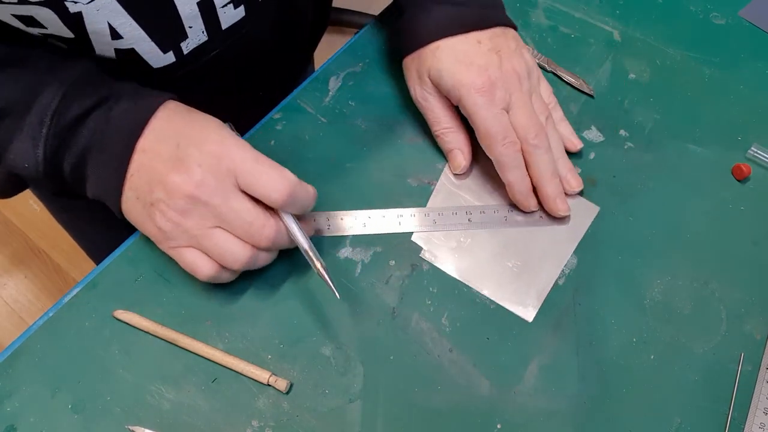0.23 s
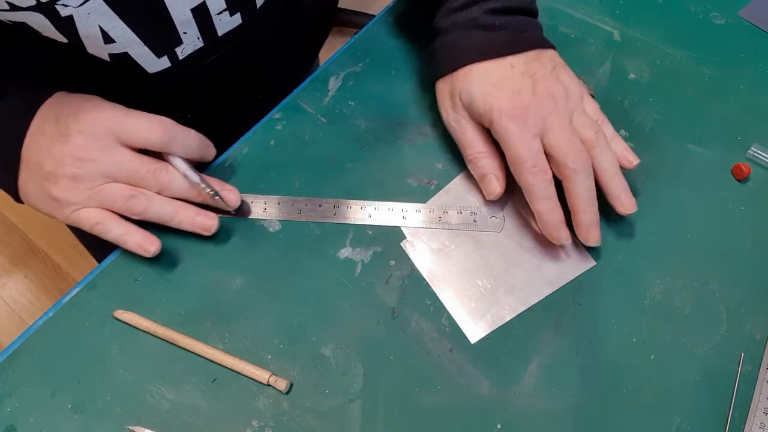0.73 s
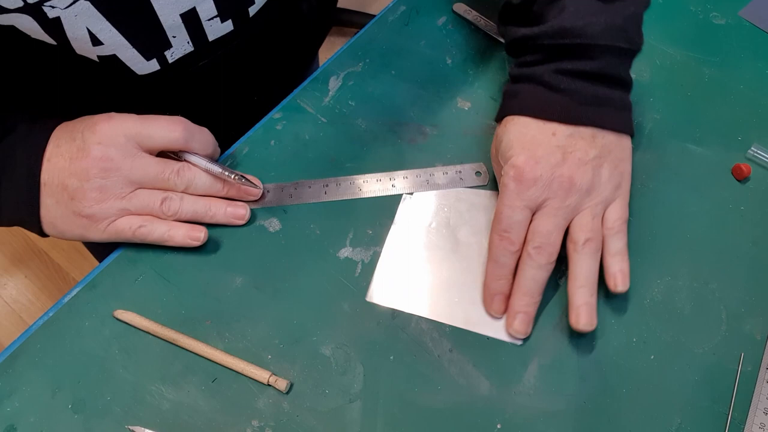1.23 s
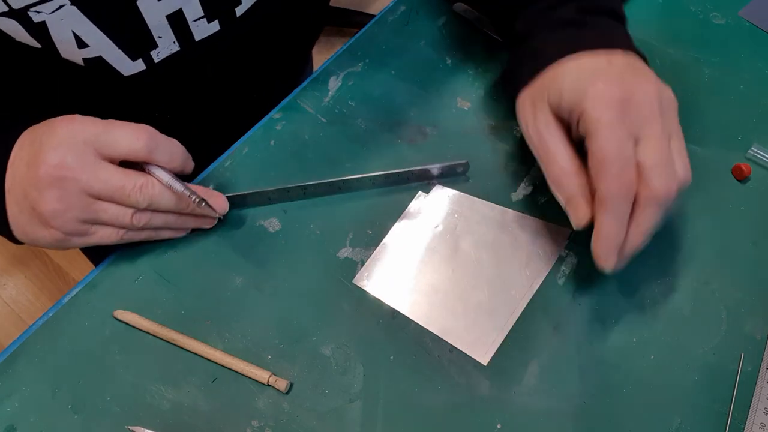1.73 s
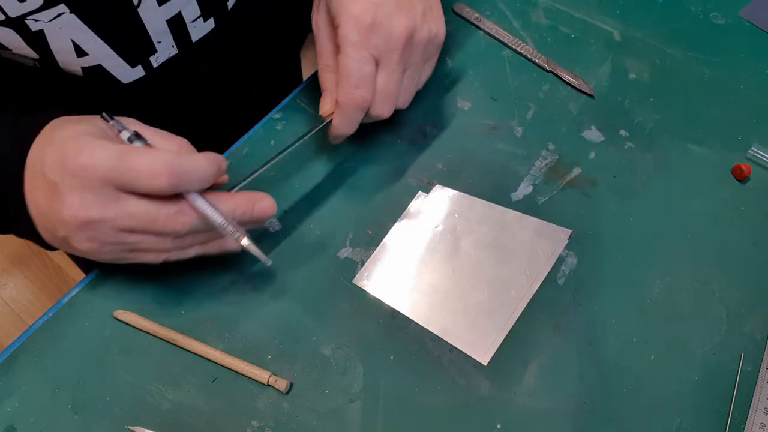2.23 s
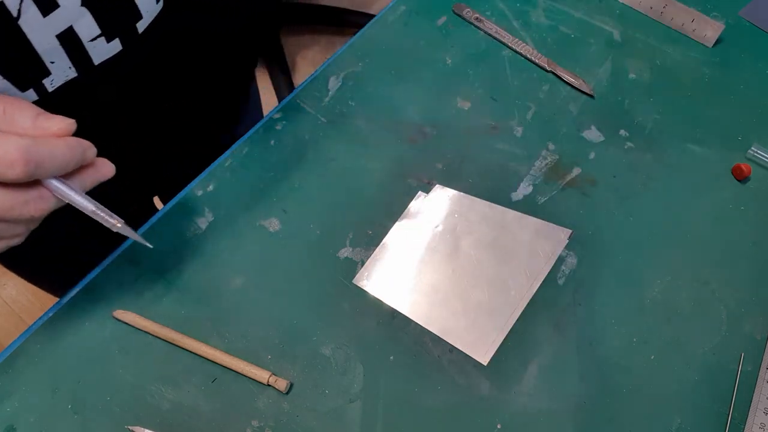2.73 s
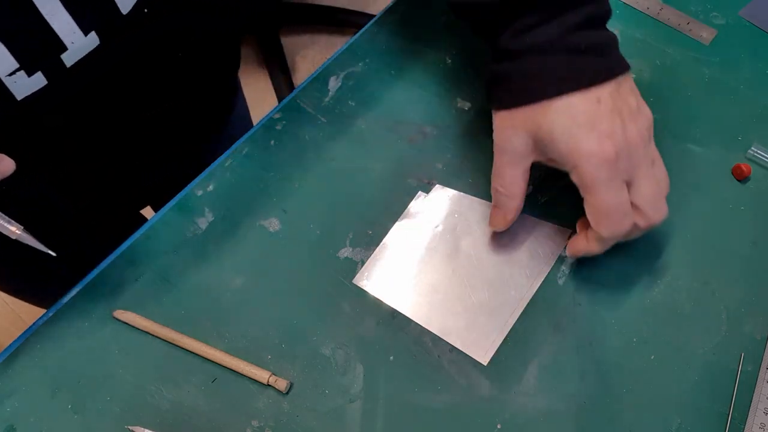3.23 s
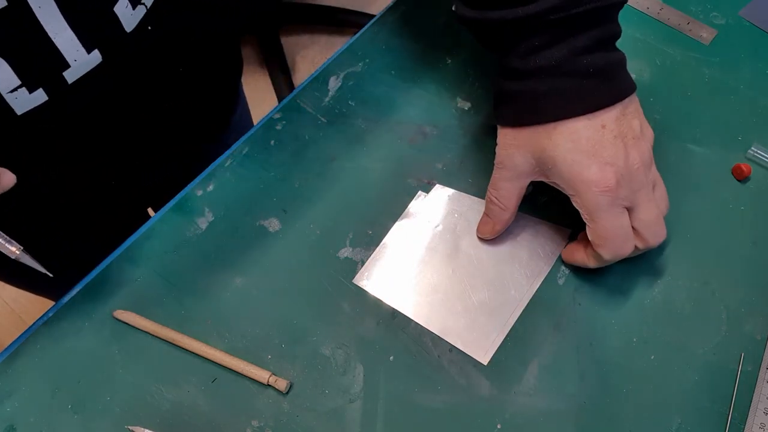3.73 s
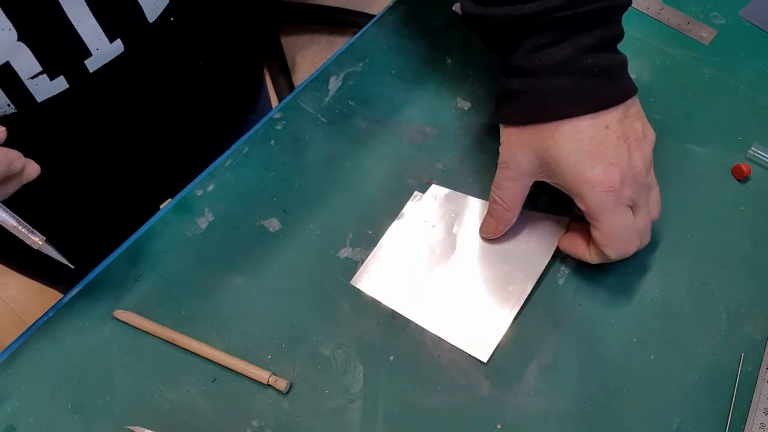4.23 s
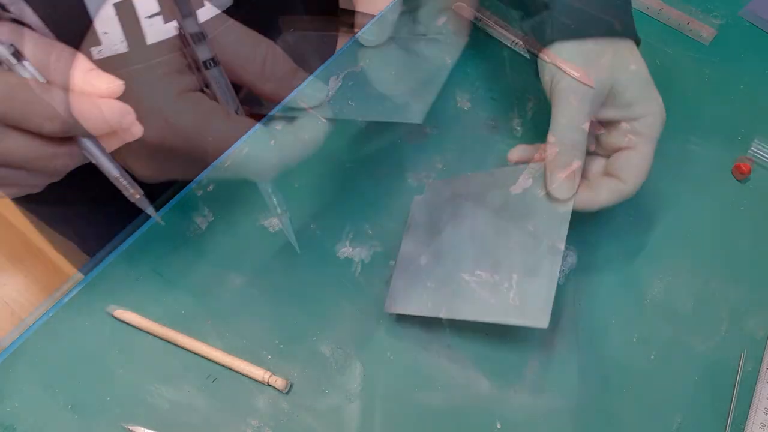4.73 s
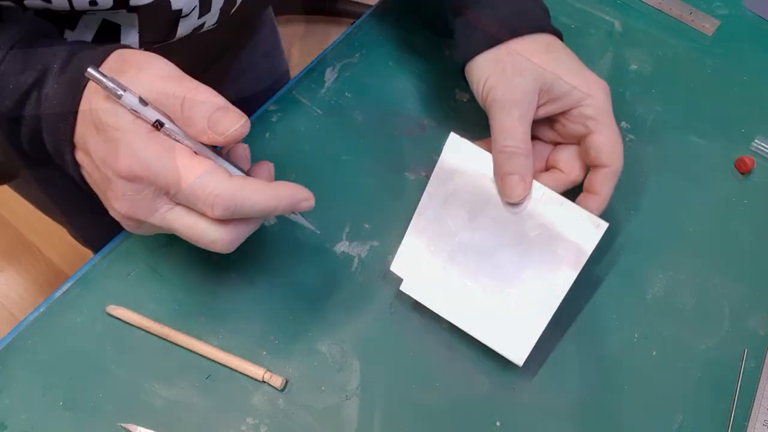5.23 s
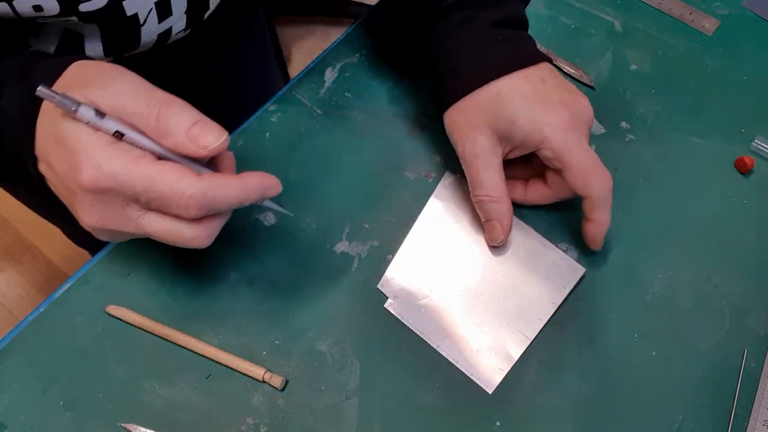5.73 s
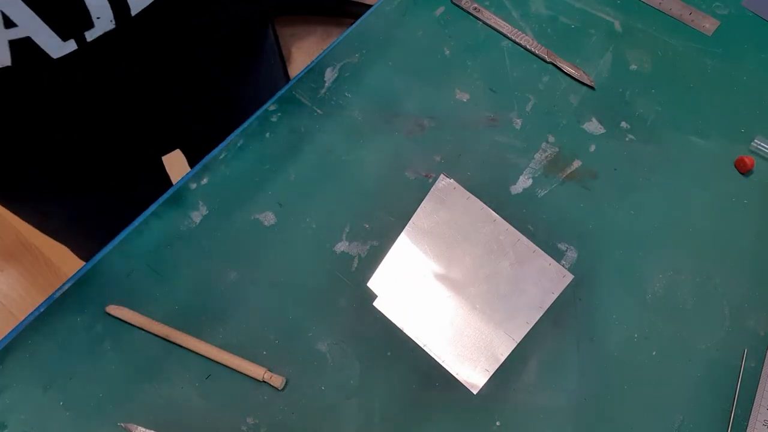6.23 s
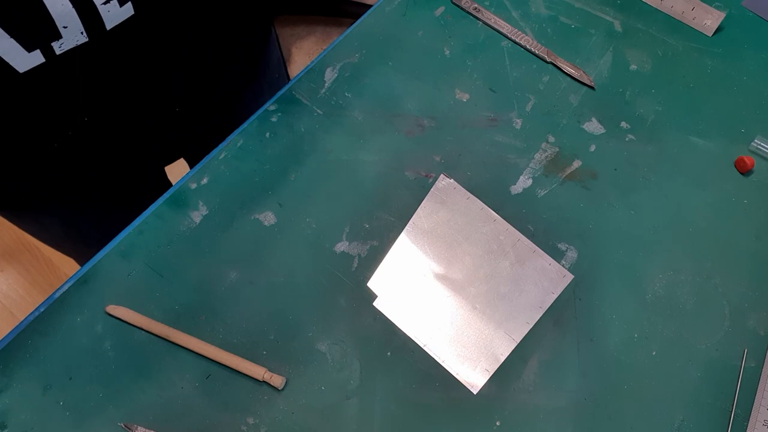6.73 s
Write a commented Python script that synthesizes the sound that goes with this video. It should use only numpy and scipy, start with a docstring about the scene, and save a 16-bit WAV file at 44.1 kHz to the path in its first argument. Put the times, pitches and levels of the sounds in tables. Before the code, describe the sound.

Close, dry small room. Aluminium sheet and steel ruler hiss over a workbench mat with hand rubs, cloth brushing and soft bumps. The ruler is put aside with a bright double clatter, followed by dull bumps. The sheet is then pried up with a sharp flick, whistling scrapes and small snaps, and laid back. Low hand thuds and sleeve rustle finish over faint rumble and hum.

```python
"""A sheet of aluminium and a steel ruler slide over a workbench mat: filtered grit, with hand rubs, sleeves and soft bumps.
At 2.6 s the ruler is put aside with a clatter of damped modes and noise bursts; more bumps follow.
From 4.1 s the sheet is pried up, scrapes and is laid back: grit through a moving air resonance, ringing sheet, flicks.
From 5.9 s sleeves brush, and hands and a metal scriber bump down: bench modes and short noise.
Throughout: a small, dry room close by, with air noise, rumble and a low hum of two wavering sines."""
import sys
import numpy as np
from scipy import signal
from scipy.fft import rfft, irfft, next_fast_len
from scipy.io import wavfile
from scipy.ndimage import map_coordinates

SR = 44100
rng = np.random.default_rng(int(sys.argv[2]) if len(sys.argv) > 2 else 0)


def unload_wav(signal):
    """Save mono or channel-first audio to the path in sys.argv[1] as 16-bit WAV at rate SR, clipped to [-1, 1]."""
    wavfile.write(
        sys.argv[1],
        SR,
        np.round(np.clip(np.atleast_2d(signal).T, -1, 1) * 32767).astype(np.int16),
    )


N = 307597
T = np.arange(SR // 2) / SR  # time axis of one contact, s
TOP_HZ = 15850  # band limit
RUMBLE_DB, LEAN_DB = -65.5, 5.5  # still room; moving arm relative to its sleeve
# Boom under a thud: the higher the thud, the more it reaches the hollow body.
BODY_DB, BODY_DB_PER_OCTAVE, BODY_FROM_HZ = -18, 7.5, 109

# Event levels are before the trims in the mix.
# Sheet and ruler pushed over the mat. Each row: start in seconds, length in seconds, hiss in dB.
PUSH_ROWS = [(0.0, 0.055, -64.5), (0.08, 0.078, -58.5), (0.165, 0.31, -52), (0.765, 0.41, -56.5),
             (1.135, 0.14, -46.5), (1.32, 0.068, -64), (1.71, 0.055, -75), (2.135, 0.028, -68),
             (2.2, 0.071, -77.5), (2.345, 0.048, -73), (2.49, 0.23, -70)]
# Hands rubbing the mat. Each row: start in seconds, length in seconds, rub in dB, bench-top drone in dB.
RUB_ROWS = [(0.095, 0.3, -53.5, -56.5), (0.355, .12, -45, -53.5), (0.52, 0.26, -72, -63),
            (0.897, 0.069, -53, -56.5), (1.15, 0.18, -59, -70), (1.305, 0.053, -49.5, -54.5),
            (1.39, 0.13, -69.5, -65), (1.627, .045, -60.5, -61), (1.708, 0.051, -54.5, -55.5),
            (2.19, 0.094, -90, -71), (5.04, .1, -85, -75)]
# Sleeves brushing the bench. Each row: start in seconds, length in seconds, level in dB.
SLEEVE_ROWS = [(0.06, 0.069, -63.5), (0.15, .37, -59.5), (0.55, 0.34, -76), (0.95, 0.49, -65.5),
               (1.28, 0.17, -63), (2.08, .2, -76), (5.93, 0.27, -77), (6.14, 0.28, -65),
               (6.5, 0.078, -62.5), (6.68, 0.12, -61.5), (6.9, 0.083, -64.5)]
# Ruler landing. Each row: start in seconds, crack in dB, clack in dB, steel ring in dB, thud in dB.
RULER_HITS = [(2.6174, -43.5, -54.5, -41, -51.5), (2.676, -50, -62.5, -48, -60),
              (2.7079, -29, -36.5, -42, -39), (2.8025, -26, -17, -34.5, -31)]
# Lifted edge brushing the mat. Each row: start in seconds, length in seconds, wedge whistle in dB, hiss in dB.
SCRAPE_ROWS = [(4.135, .11, -68, -72.5), (4.25, 0.064, -55.5, -63.5), (4.355, 0.039, -46.5, -61.5),
               (4.45, .065, -66, -74.5), (4.51, 0.14, -49.5, -58), (4.67, 0.035, -63, -87),
               (4.82, 0.072, -69, -75), (5.06, 0.17, -85, -74.5), (5.2, .15, -71, -80),
               (5.42, 0.12, -66.5, -80), (5.54, 0.057, -61.5, -65), (5.61, .08, -65, -84),
               (5.688, 0.07, -52.5, -63.5)]
# Edge digging in and chattering. Each row: start in seconds, length in seconds, level in dB.
DIG_ROWS = [(4.372, 0.034, -50.5), (4.51, 0.15, -47)]
# Air wedge under the sheet, lower as it opens. Each row: time in seconds, nominal resonance in Hz.
WEDGE_PATH = [(4.2, 4420), (4.36, 2950), (4.4, 2370), (4.48, 1620), (4.62, 1800), (4.71, 1240), (4.9, 1684),
              (5.66, 1846), (5.77, 2830)]
# Edge catching and flicking. Each row: start in seconds, level in dB, brightest Hz, spread in octaves.
FLICK_ROWS = [(0.179, -37, 7000, 1.3), (0.748, -51, 5240, 0.11), (0.774, -42, 5870, 0.11),
              (0.7914, -33.5, 5950, 0.24), (4.2539, -21.5, 3720, 0.5), (4.5213, -28.5, 1210, 1.16),
              (4.8958, -31, 2230, 1.9), (5.106, -44, 6300, 0.22), (5.4998, -52, 1730, 0.79),
              (5.787, -42, 4270, 1.1)]
# Hands bumping. Each row: start in seconds, thud in dB, knock in dB, tick in dB, strongest thud Hz.
BUMP_ROWS = [(0.083, -38.5, -70, -64, 70.4), (0.139, -43, -64, -61.5, 119),
             (0.464, -47, -41.5, -48.5, 147.5), (0.788, -36.5, -65, -74, 55.7),
             (1.319, -45, -47, -52, 65.15), (1.627, -48, -43, -60, 136), (3.307, -33, -66.5, -73, 90),
             (3.425, -35.5, -67, -63.5, 74), (3.694, -43.5, -72, -78, 65.9), (3.878, -37.5, -64, -70.5, 85),
             (5.058, -56, -64, -75, 69), (6.312, -24, -47, -56, 89), (6.343, -34.5, -48, -49, 105),
             (6.513, -31, -45.5, -52, 99), (6.68, -33.5, -42.5, -46.5, 77), (6.746, -41, -53, -47.5, 108),
             (6.924, -41, -71, -67.5, 95.7)]

# Modes. Each row: frequency in Hz, relative level in dB, t60 in seconds.
# Ruler against the bench top.
CLACK_MODES = [(643, -23.5, 0.046), (1017, -17.5, .05), (1357, -10, 0.035), (1537, -12, 0.027),
               (2200, -14, 0.023), (3000, -0.5, 0.013), (3224, 0.5, 0.012), (3680, -9, 0.01),
               (4770, -9.5, .018), (5850, -12.5, .015)]
# High modes of the steel.
STEEL_MODES = [(6750, -5, .04), (10080, -0.5, 0.044), (10400, -3, 0.033), (11150, -6, 0.051),
               (12500, 1, 0.04), (14000, -1, .04), (15120, -2, 0.035)]
# Aluminium sheet, damped by the fingers.
SHEET_MODES = [(808, -2.5, 0.062), (1020, -1, 0.045), (2215, -3, 0.075), (2880, -23, 0.021),
               (3230, 1, 0.051), (3614, 0.5, 0.039), (4120, 5, 0.02), (4620, 3.5, 0.021),
               (5670, -4.5, 0.036), (6670, 2, 0.028), (8850, -29, .02)]
# Bench swinging as a whole.
BENCH_MODES = [(60.4, -6, 0.27), (93.3, -1.5, 0.13), (109.6, -2.5, .14), (166, -11, 0.11),
               (207.3, -9.5, 0.16)]
# Hollow body of the bench.
BODY_MODES = [(176, -8.5, 0.27), (215, 2, 0.17), (239, -10, 0.16), (274, -12, 0.15)]
# Top panel of the bench.
PANEL_MODES = [(371, -2, 0.08), (467.5, -0.5, 0.11), (562, -5.5, 0.068), (682, -9.5, 0.096),
               (903, -10, 0.031), (1040, 3, 0.028)]

# Spectra. Each row: frequency in Hz, relative level in dB.
# Metal over dust on the mat.
HISS_SPECTRUM = [(1200, -6), (2500, -3), (4500, -3.5), (6500, -0.5), (8200, -4.5), (11000, -3),
                 (15500, -2.5)]
# Hands on the mat.
RUB_SPECTRUM = [(550, -19.5), (850, 1), (1250, 0), (1700, 0), (2500, -7.5), (4000, -14), (7000, -41.5)]
# Bench top under the hands.
DRONE_SPECTRUM = [(150, -7), (280, -5.5), (380, -14), (520, -1.5), (640, -1.5), (800, -12.5), (1400, -32.5)]
# Chattering sheet edge.
RASP_SPECTRUM = [(200, -12.5), (400, -18.5), (700, -14.5), (1200, -5), (2300, -2), (3200, -6), (4300, -8),
                 (6500, -13), (8500, -22.5), (15500, -28)]
# Sleeves on the bench.
SLEEVE_SPECTRUM = [(180, -48), (300, -8), (423, -11.5), (515, -4.5), (1540, -18.5), (1730, -6),
                   (1910, -18.5), (15000, -28.5)]
# Noisy part of the ruler's landing.
CRACK_SPECTRUM = [(150, -2.5), (400, -1), (700, 0.5), (1200, -3), (2000, -6), (3200, -7.5), (4500, -10),
                  (6300, -12.5), (8200, -20), (10500, -16.5), (15500, -20.5)]
# Bright wash of the struck steel.
SPLASH_SPECTRUM = [(3000, -14.5), (6000, -5.5), (8500, -12.5), (10300, -0.5), (13000, 1), (15500, -0.5)]
# Scriber tick.
TICK_SPECTRUM = [(500, -17), (1200, 4), (2200, 0.5), (3200, 3.5), (4500, -4), (6500, -4.5), (8500, -16.5),
                 (15000, -9)]
# Dull contact.
KNOCK_SPECTRUM = [(150, -14), (280, 6.5), (350, -11), (500, 7.5), (900, -2.5), (1500, -10.5), (3000, -33)]
# Room rumble.
RUMBLE_SPECTRUM = [(20, -34.5), (40, -11), (60, -1.5), (85, -5), (115, -3.5), (150, -16.5), (300, -29.5),
                   (600, -47)]
# Room air.
AIR_SPECTRUM = [(100, 1), (220, 1.5), (400, -8), (600, -8), (1000, -13), (2500, -16), (5000, -19.5),
                (8000, -29), (12000, -25), (15800, -23.5)]
# Sound returned by the walls.
WALL_SPECTRUM = [(80, -9), (300, -3), (700, 0), (2000, 0.5), (4000, -2.5), (8000, -5), (15000, -3)]

# Hum sines. Each row: frequency in Hz, amplitude in dB before trim.
HUM_TONES = [(64.6, -73), (118.4, -66.5)]
# Likeness of the two channels. Each row: frequency in Hz, correlation from 0 to 1.
CHANNEL_LIKENESS = [(100, 0.97), (300, 0.65), (550, 0.46), (1100, 0.031), (3000, 0)]
# Room decay. Each row: frequency in Hz, t60 in seconds.
ROOM_T60 = [(100, 0.2), (500, .26), (3000, 0.23), (8000, 0.32), (15000, .18)]


def amp(db):
    """Decibels to gain."""
    return 10 ** (np.asarray(db) / 20)


def unit(x):
    """Scale to rms 1."""
    return x / np.sqrt(np.mean(x ** 2) + 1e-20)


def blow(x):
    """Scale a short sound to rms 1 over its first 10 ms."""
    return x / np.sqrt(np.mean(x[:, :SR // 100] ** 2))


def along(points, hz):
    """Read (Hz, value) points on a log axis."""
    f, v = np.transpose(points)
    return np.interp(np.log(hz + 1), np.log(f + 1), v)


def wobble(knots_per_s):
    """Smooth random curve through normal-distributed knots."""
    knots = rng.standard_normal(int(N * knots_per_s / SR) + 4)
    return map_coordinates(knots, [np.arange(N) * knots_per_s / SR])


def filtered(x, response):
    """Apply a gain given as a function of Hz."""
    n = x.shape[-1]
    m = next_fast_len(n + 8192)
    return irfft(rfft(x, m) * response(np.fft.rfftfreq(m, 1 / SR)), m)[..., :n]


def coloured(pair, spectrum):
    """Shape two unrelated signals and make their bass alike; rms 1."""
    def mid_side_gain(hz):
        angle = np.arccos(np.clip(along(CHANNEL_LIKENESS, hz), -1, 1)) / 2
        return amp(along(spectrum, hz)) * [np.cos(angle), np.sin(angle)]
    mid, side = filtered(pair, mid_side_gain)
    return unit(np.array([mid + side, mid - side]))


def add(track, start_s, sound):
    """Mix a sound in at its start time."""
    part = track[:, round(start_s * SR):][:, :sound.shape[1]]
    part += sound[:, :part.shape[1]]


def rise(seconds):
    """Smooth onset of a contact."""
    return 1 - np.exp(-(T / seconds) ** 2)


def around(centre_hz, octaves):
    """Gain of frequency that favours one region."""
    return lambda hz: 1 / (1 + (np.log2((hz + 1) / centre_hz) / octaves) ** 2)


def grit(slips_per_s, spread_db):
    """Random slips of a rough contact; a positive spread makes a few stand out, a negative one recede."""
    slips = rng.random(N) < slips_per_s / SR
    size = amp(spread_db * np.minimum(rng.exponential(size=N), 4))
    return unit(slips * size * rng.standard_normal((2, N)))


def ring(modes, scatter_db, attack_s, colour=lambda hz: 1):
    """Damped modes; the higher ones reach the two microphones out of step."""
    out = np.zeros((2, len(T)))
    for hz, db, t60_s in modes:
        phase = rng.uniform(-2.0, 1.4) * min(hz / 1000, 1) * np.array([[1], [-1]])
        envelope = amp(db + scatter_db * rng.normal() - 60 * T / t60_s)
        out += colour(hz) * envelope * np.sin(2 * np.pi * hz * T + phase)
    return blow(out * rise(attack_s))


def burst(spectrum, t60_s, attack_s):
    """Crowded, short-lived modes as decaying noise."""
    noise = coloured(rng.standard_normal((2, len(T))), spectrum)
    return blow(noise * amp(-60 * T / t60_s) * rise(attack_s))


def excite(force, modes):
    """A steady rubbing force keeps modes ringing; rms 1."""
    response = ring(modes, scatter_db=0.5, attack_s=0.00089)
    return unit(signal.fftconvolve(force, response, axes=1)[:, :N])


def strokes(rows, attack_s, swell_db, fade_db_per_s):
    """Gain per dB column: each stroke sets in, swells as the hand presses on, then dies away."""
    power = np.zeros((len(rows[0]) - 2, N))
    age_s = np.arange(SR) / SR
    onset = 1 - np.exp(-(age_s / attack_s) ** 2)
    for start_s, length_s, *levels_db in rows:
        swell = swell_db * np.minimum(age_s / length_s - 1, 0)
        fade = fade_db_per_s * np.maximum(age_s - length_s, 0)
        add(power, start_s, np.outer(amp(levels_db), amp(swell - fade) * onset) ** 2)
    return np.sqrt(power)


def in_room(x, wet_db):
    """Add a decaying noise tail that starts after 3 ms and fades in over 4.6 ms."""
    noise = coloured(rng.standard_normal((2, len(T))), WALL_SPECTRUM)
    hz, t, z = signal.stft(noise, SR, nperseg=256)
    decay = amp(-60 * t / along(ROOM_T60, hz)[:, None])
    tail = signal.istft(z * decay, SR, nperseg=256)[1][:, :len(T)]
    tail = tail * np.clip((T - .003) / 0.0046, 0, 1)
    wet = signal.fftconvolve(x, tail / np.linalg.norm(tail[0]), axes=1)[:, :x.shape[1]]
    return x + amp(wet_db) * wet


def arms():
    """Arm movement: drives sleeve brush and bench rumble."""
    return strokes(SLEEVE_ROWS, attack_s=0.026, swell_db=0.5, fade_db_per_s=129.5)[0]


def background():
    """Air noise, rumble that grows with arm movement, and hum sines wavering in level and phase."""
    t = np.arange(N) / SR
    hum = np.zeros(N)
    for hz, db in HUM_TONES:
        level = amp(db - 0.5 + 0.64 * wobble(8.7))
        hum += level * np.sin(2 * np.pi * hz * t + .5 * wobble(3.3))
    rumble_level = np.hypot(amp(RUMBLE_DB), amp(LEAN_DB) * arms())
    rumble = rumble_level * coloured(rng.standard_normal((2, N)), RUMBLE_SPECTRUM)
    air = amp(-72.5) * coloured(rng.standard_normal((2, N)), AIR_SPECTRUM)
    return hum + rumble + air


def bumps():
    """Blows swing the bench and boom in its body, with some ringing of its top and scriber tick."""
    out = np.zeros((2, N))
    for start_s, db, knock_db, tick_db, thud_hz in BUMP_ROWS:
        body_db = db + BODY_DB + BODY_DB_PER_OCTAVE * np.log2(thud_hz / BODY_FROM_HZ)
        favour = around(thud_hz, octaves=0.41)
        thud = amp(db - 11.5) * ring(BENCH_MODES, scatter_db=3.0, attack_s=0.0081, colour=favour)
        body = amp(body_db) * ring(BODY_MODES, scatter_db=4.0, attack_s=0.0036)
        panel = amp(-6) * ring(PANEL_MODES, scatter_db=-2.5, attack_s=0.0026)
        knock = amp(-7.5) * burst(KNOCK_SPECTRUM, t60_s=0.052, attack_s=0.0028)
        tick = amp(tick_db) * burst(TICK_SPECTRUM, t60_s=0.027, attack_s=0.0023)
        add(out, start_s, thud + body + in_room(amp(knock_db) * (panel + knock) + tick, wet_db=-4.5))
    return out


def ruler():
    """One end ticks down, then it falls flat: noisy crack, clack, thin steel ring and bench thud."""
    out = np.zeros((2, N))
    for start_s, crack_db, clack_db, steel_db, thud_db in RULER_HITS:
        crack = amp(crack_db) * burst(CRACK_SPECTRUM, t60_s=.04, attack_s=0.0039)
        clack = amp(clack_db) * ring(CLACK_MODES, scatter_db=-0.5, attack_s=0.0023)
        steel_ring = amp(-4.5) * ring(STEEL_MODES, scatter_db=0.0, attack_s=.001)
        splash = amp(0.5) * burst(SPLASH_SPECTRUM, t60_s=0.032, attack_s=.001)
        steel = amp(steel_db) * (steel_ring + splash)
        thud = amp(thud_db) * ring(BENCH_MODES, scatter_db=0, attack_s=0.0087)
        metal = in_room(crack, wet_db=-4.5) + in_room(clack + steel, wet_db=-17.5)
        add(out, start_s, metal * amp([[-1], [1]]) + thud)  # metal to the right
    return out


def flicks():
    """The edge snaps free; the grip decides which sheet modes speak."""
    out = np.zeros((2, N))
    for start_s, db, bright_hz, octaves in FLICK_ROWS:
        grip = around(bright_hz, octaves)
        snap = blow(filtered(burst(HISS_SPECTRUM, t60_s=0.032, attack_s=0.00064), grip))
        modes = ring(SHEET_MODES, scatter_db=2.0, attack_s=0.0006, colour=grip)
        flick = amp(-14.0) * modes + amp(-15.5) * snap
        add(out, start_s, amp(db) * in_room(flick, wet_db=-8.5))
    return out


def air_wedge(octaves=0.12):
    """Grit through three resonances that move as the wedge opens and closes; rms 1."""
    hz, t, z = signal.stft(grit(slips_per_s=4000, spread_db=0), SR, nperseg=512)
    tremble = 1 + 0.018 * rng.standard_normal(len(t))  # sheet trembling in the hand
    centre_hz = np.interp(t, *np.transpose(WEDGE_PATH)) * tremble

    def peak(ratio):
        return around(ratio * centre_hz, octaves)(hz[:, None])
    peaks = peak(0.97) + amp(-9.5) * peak(0.665) + amp(-13.5) * peak(1.57)
    mid, side = signal.istft(z * peaks / np.sqrt(centre_hz), SR, nperseg=512)[1][:, :N]
    return unit(mid + amp(-6.0) * np.array([side, -side]))


def scraping(chatter_db=3):
    """The edge chatters over the mat, rings the sheet and sounds the air wedge under it."""
    whistle, hiss = strokes(SCRAPE_ROWS, attack_s=0.021, swell_db=4, fade_db_per_s=330)
    chatter, = strokes(DIG_ROWS, attack_s=0.021, swell_db=1, fade_db_per_s=552)
    wedge = air_wedge()
    unevenness = amp(chatter_db * wobble(200))
    slips = unevenness * coloured(grit(slips_per_s=1800, spread_db=-1.5), RASP_SPECTRUM)
    edge = amp(2.5) * slips + amp(-3) * excite(slips, SHEET_MODES)
    fizz = coloured(grit(slips_per_s=11000, spread_db=0.5), HISS_SPECTRUM)
    scrape = amp(-0.5) * whistle * wedge + chatter * edge + amp(7.5) * hiss * fizz
    return in_room(amp(2.25 * wobble(60)) * scrape, wet_db=-13.0)


def sliding():
    """Dust hisses under the metal; hands rub lower, the bench top drones along and sleeves brush."""
    hiss, = strokes(PUSH_ROWS, attack_s=0.022, swell_db=2.5, fade_db_per_s=210)
    rub, drone = strokes(RUB_ROWS, attack_s=0.0047, swell_db=6.5, fade_db_per_s=294)
    pressure = amp(2 * wobble(32))
    metal = amp(5.5) * hiss * coloured(grit(slips_per_s=9000, spread_db=1.5), HISS_SPECTRUM)
    # The dragged ruler sings faintly.
    steel = amp(-5) * hiss * excite(rng.standard_normal((2, N)), STEEL_MODES)
    hands = amp(0.5) * rub * coloured(grit(slips_per_s=2700, spread_db=1.5), RUB_SPECTRUM)
    top = drone * coloured(grit(slips_per_s=2000, spread_db=0.0), DRONE_SPECTRUM)
    sleeves = amp(-1.5) * arms() * coloured(grit(slips_per_s=13000, spread_db=-1), SLEEVE_SPECTRUM)
    return in_room(pressure * (metal + steel + hands + top + sleeves), wet_db=-12)


def scene():
    """Sum of all layers, a little right of centre."""
    mix = sliding() + scraping() + flicks() + ruler() + bumps() + background()
    return mix * amp([[-.8], [.6]])


def record(dry):
    """Recorder response: deepest bass thinned, steep cut at the band limit."""
    def response(hz):
        bass_cut = hz ** 2 / np.hypot(hz ** 2, 35 ** 2)
        return bass_cut / (1 + (hz / TOP_HZ) ** 200)
    return filtered(dry, response)


dry = scene()
out = record(dry)
unload_wav(out)
```